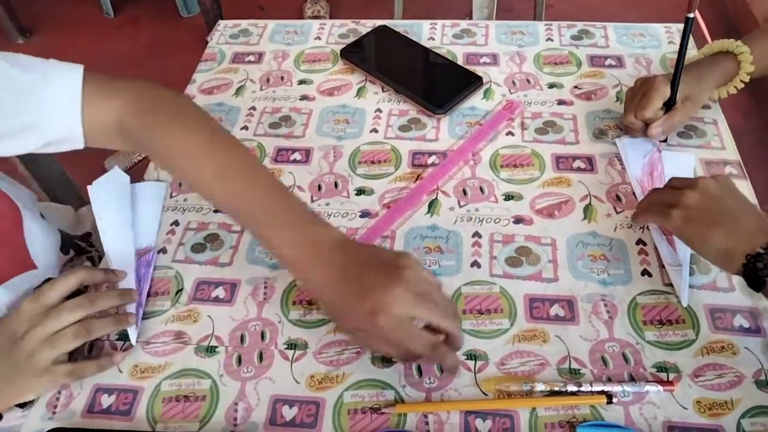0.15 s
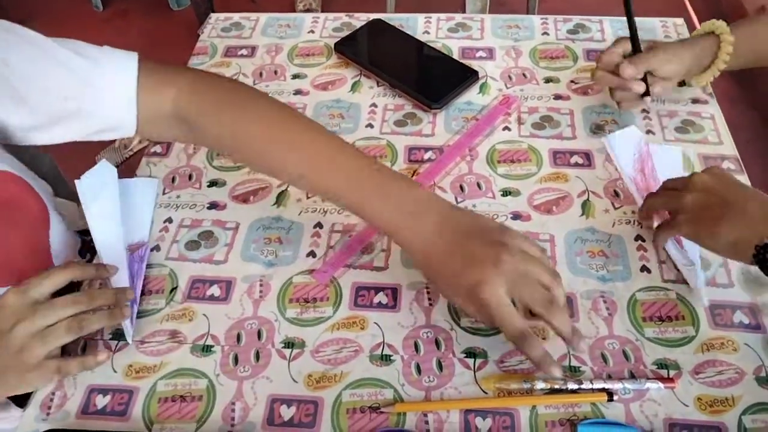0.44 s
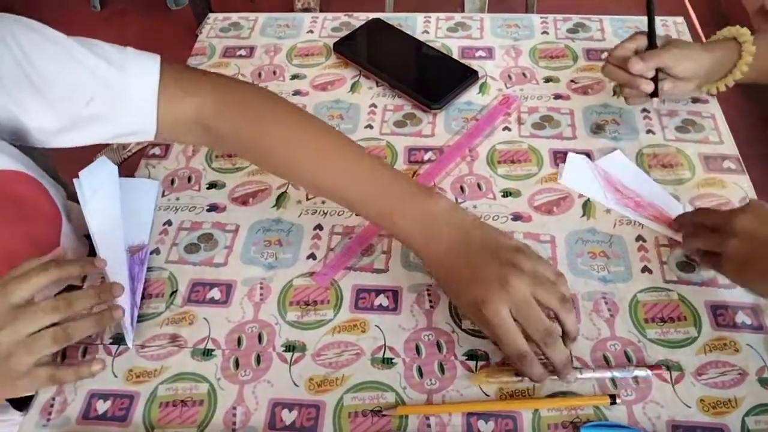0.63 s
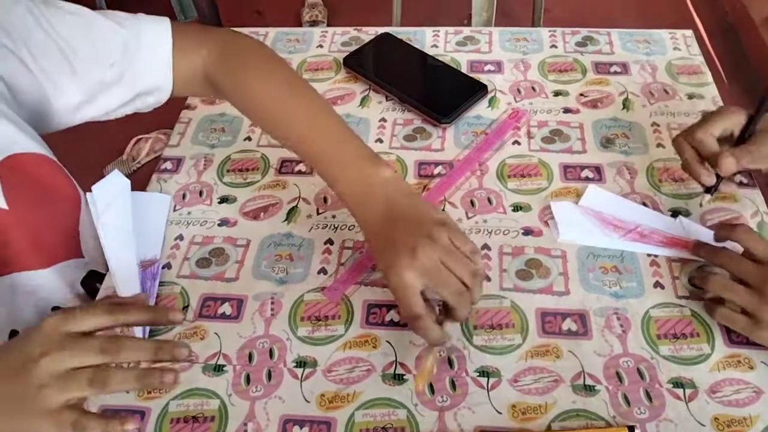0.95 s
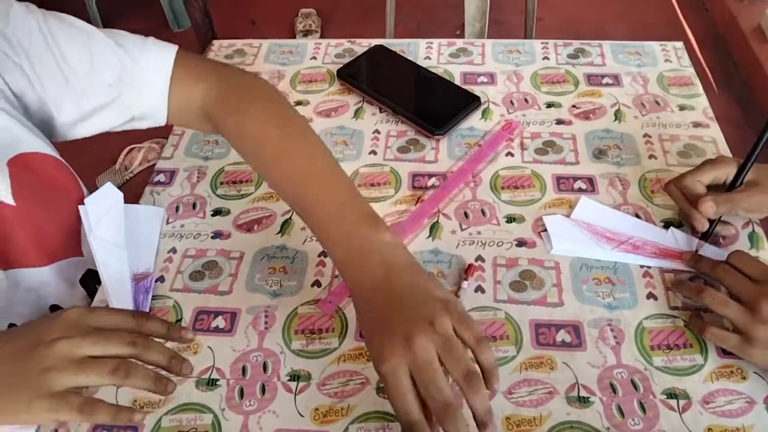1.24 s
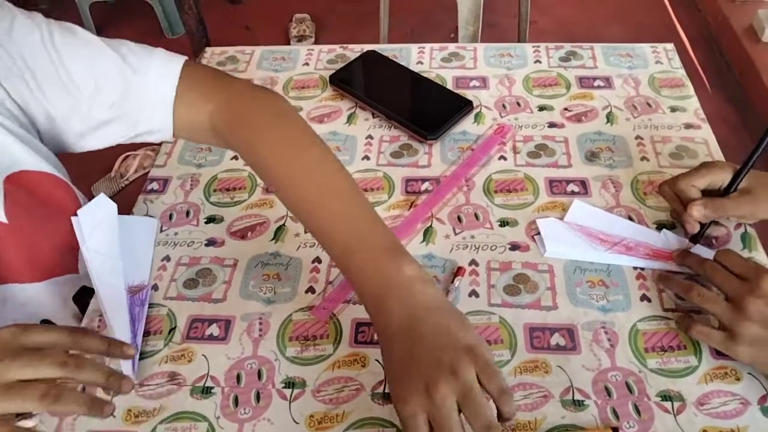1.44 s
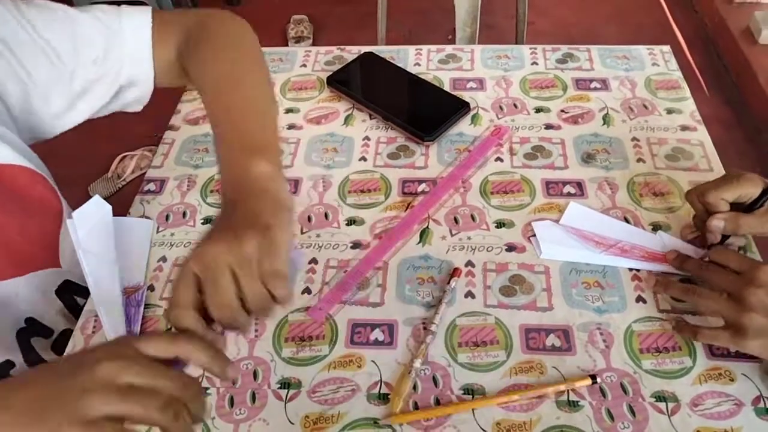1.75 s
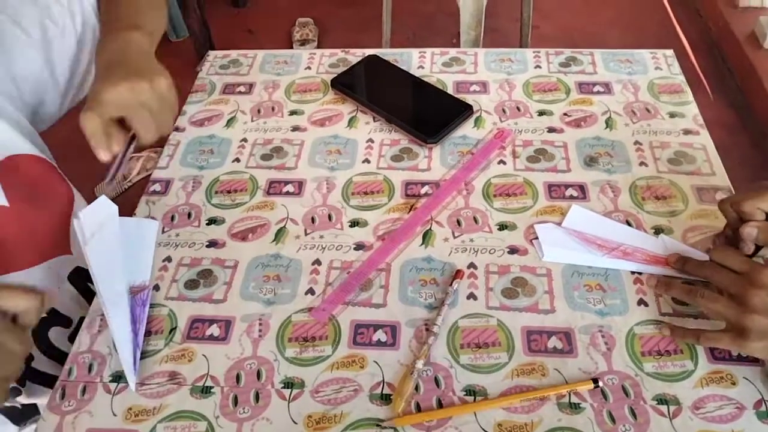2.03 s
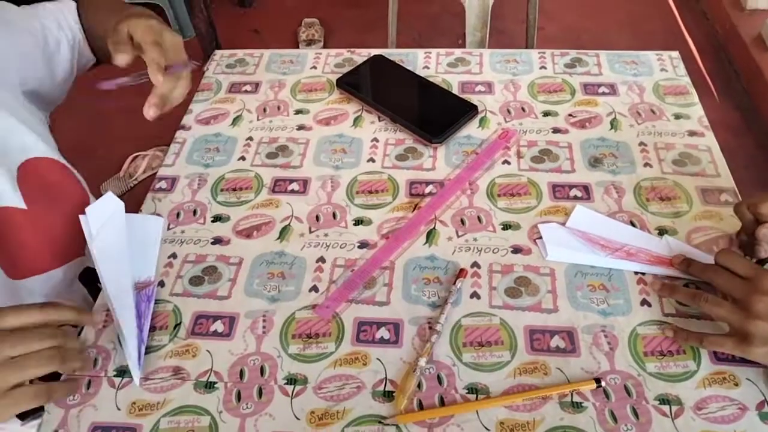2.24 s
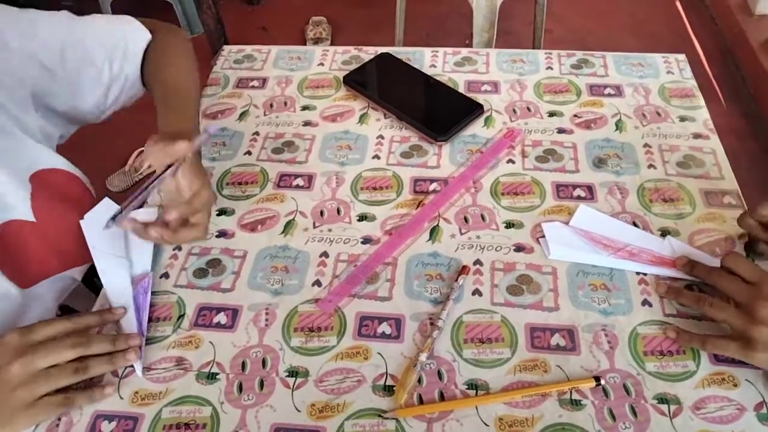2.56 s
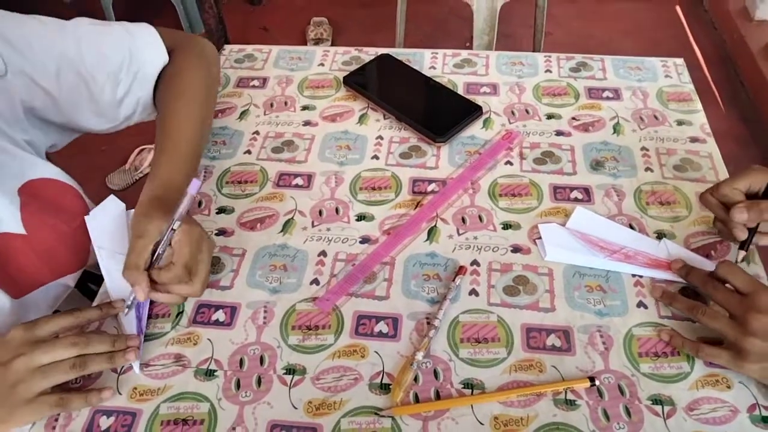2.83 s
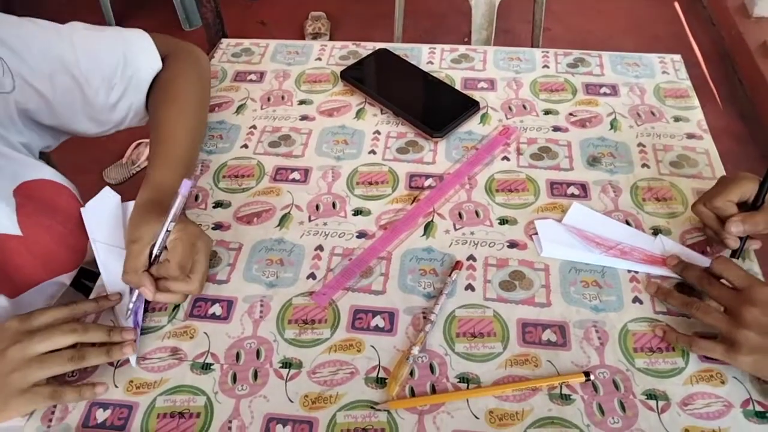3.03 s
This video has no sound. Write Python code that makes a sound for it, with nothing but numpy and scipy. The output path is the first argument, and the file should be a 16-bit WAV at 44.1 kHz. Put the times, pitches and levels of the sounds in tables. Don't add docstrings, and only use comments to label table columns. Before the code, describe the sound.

Pens clatter and tap on a thin tabletop with crackling paper, over a fading low engine hum

```python
import sys
import numpy as np
from scipy import signal
from scipy.fft import rfft, irfft, next_fast_len
from scipy.io import wavfile
from scipy.ndimage import map_coordinates

SR = 44100
rng = np.random.default_rng(int(sys.argv[2]) if len(sys.argv) > 2 else 0)


def master_out(mix):
    frames = np.transpose(np.atleast_2d(mix))
    ceiling = np.clip(frames, -1, 1)
    pcm = np.round(ceiling * 32767).astype(np.int16)
    wavfile.write(sys.argv[1], SR, pcm)


def magnitude_from_level(level_db):
    exponent = np.asarray(level_db, float) / 20
    return 10 ** exponent


N = 141120
TIP_HZ = 8946


def unit(x):
    return x / np.sqrt(np.mean(x ** 2) + 1e-20)


def along(points, hz):
    f, v = np.transpose(points)
    return np.interp(np.log(hz + 1), np.log(f + 1), v)


def curves(rows):
    s, *cols = np.transpose(rows)
    return [np.interp(np.arange(N) / SR, s, c) for c in cols]


def wobble(rate):
    knots = rng.standard_normal(int(N * rate / SR) + 4)
    return map_coordinates(knots, [np.arange(N) * rate / SR])


def filtered(x, response):
    m = next_fast_len(N + SR // 2)
    return irfft(rfft(x, m) * response(np.fft.rfftfreq(m, 1 / SR)), m)[:N]


def coloured(x, spectrum):
    return unit(filtered(x, lambda hz: magnitude_from_level(along(spectrum, hz))))


def resonant(x, peaks):
    def response(f):
        total = 0
        for k, (centre, width, db) in enumerate(peaks):
            loss = 1j * f * width
            total = total + (-1) ** k * magnitude_from_level(db) * loss / (centre * centre - f * f + loss)
        return total
    return filtered(x, response)


def add(track, s, sound):
    part = track[round(s * SR):][:len(sound)]
    part += sound[:len(part)]


def sine(hz, t):
    return np.sin(2 * np.pi * hz * t)


def decay(db, t, t60):
    return magnitude_from_level(db - 60 * t / t60)


def shiver(hz, t, size):
    drift = np.convolve(rng.standard_normal(len(t)) + 0.11, np.hanning(size), "same")
    return np.sin(2 * np.pi * hz * t + 6 * rng.random()) * unit(drift)


def grains(spectrum):
    grains_per_s, grain_db, grain_s, smooth = 900, 2, 0.00052, 1.5
    sizes = magnitude_from_level(grain_db * rng.exponential(size=N).clip(0, 3))
    hits = (rng.random(N) < grains_per_s / SR) * sizes
    envelope = signal.lfilter([1], [1, -np.exp(-1 / (grain_s * SR))], hits) + smooth
    return coloured(envelope * rng.standard_normal(N), spectrum)


def pen_contacts():
    # t/s, tip level/dB, barrel f/Hz, barrel level/dB
    taps = [(0.131, -34, 1870, -32.5), (0.6362, -30, 2640, -31.5), (0.6695, -32, 2650, -36),
            (0.6895, -35, 2250, -34), (0.692, -35, 2230, -34), (0.7045, -35, 2220, -36),
            (0.8035, -8, 2710, -26), (0.8047, -22.5, 2150, -27), (0.8063, -21, 2476, -17),
            (0.8083, -19, 1590, -25), (0.813, -27, 4300, -40), (0.8225, -28, 2500, -32),
            (0.832, -24, 2620, -30), (0.9376, -7.5, 2160, -22), (0.9402, -1.5, 1590, -20.5),
            (0.9434, -19, 2100, -33), (0.9416, -10, 2160, -21), (0.9613, -6, 1980, -15.5),
            (1.2285, -16, 2340, -26.5), (1.263, -15.5, 2490, -27), (1.2676, -34, 2350, -25.5),
            (1.272, -30, 2300, -29), (1.277, -37, 2460, -33), (1.287, -37, 2340, -34),
            (1.292, -35, 2040, -32), (1.301, -35, 2400, -37), (1.2818, -22, 2300, -23),
            (1.366, -14, 2120, -20), (1.3675, -18.5, 1904, -23.5), (1.3705, -30, 1970, -30),
            (1.4893, -2, 2514, -11), (1.4938, -15, 2250, -22.5), (2.263, -51, 2440, -39.5),
            (2.8593, -52, 1900, -49.5), (2.8754, -51, 1770, -48), (2.8883, -50, 1910, -47.5)]
    # t/s, tip level/dB, tip f/Hz, barrel level/dB
    ticks = [(0.3005, -22.5, 9050, -50), (1.0113, -20.5, 8400, -46), (1.233, -20.5, 9300, -36),
             (1.2458, -23, 8400, -54), (1.3275, -22, 9570, -50), (1.4284, -16, 8770, -42),
             (1.823, -10.5, 7000, -20.5), (1.8606, -29.5, 6300, -55), (2.2563, -34, 6000, -47),
             (2.271, -33.5, 7140, -59), (2.298, -35, 7170, -47), (2.5432, -21.5, 7700, -63),
             (2.7504, -26.5, 7870, -36.5), (2.941, -25.5, 8740, -50), (3.167, -23, 9570, -49)]
    # f/Hz, level/dB
    crack_colour = [(700, -23), (1800, -7), (3300, -17), (5000, -7), (6200, -6.5), (8800, 1.5),
                    (11000, -23), (15000, -12)]
    tick_barrel_hz, upper_ratio, upper_db = 2575, 1.362, -8
    barrel_t60, tip_t60, crack_t60 = 0.0094, 0.0067, 0.0072
    top_ring_hz, top_ring_db = 13940, -15
    out, t = np.zeros(N), np.arange(SR // 20) / SR
    cracks = coloured(rng.standard_normal(N), crack_colour)
    contacts = [(s, tip_db, TIP_HZ, hz, db) for s, tip_db, hz, db in taps]
    contacts += [(s, tip_db, hz, tick_barrel_hz, db) for s, tip_db, hz, db in ticks]
    for s, tip_db, tip_hz, hz, barrel_db in contacts:
        barrel = sine(hz, t) - magnitude_from_level(upper_db) * sine(upper_ratio * hz, t)
        barrel = barrel + 0.45 * shiver(1.234 * hz, t, size=48)
        barrel = barrel * decay(barrel_db + 9, t, barrel_t60)
        tip = sine(tip_hz, t) + 0.73 * shiver(.97 * tip_hz, t, size=36)
        tip = tip + magnitude_from_level(top_ring_db) * shiver(top_ring_hz, t, size=30)
        tip = tip * decay(tip_db - 0.5, t, tip_t60)
        noise = cracks[rng.integers(N - len(t)):][:len(t)]
        crack = decay(tip_db - 3.5, t, crack_t60) * noise
        barrel_onset = (1 - np.exp(-t / 0.00026)) ** 2
        tip_onset = 1 - np.exp(-t / 0.00035)
        add(out, s, barrel * barrel_onset + (tip + crack) * tip_onset)
    return out


def tabletop_knocks():
    # t/s, ring level/dB, thud f/Hz, thud level/dB
    knocks = [(.13, -34.5, 221, -24), (.134, -31, 628, -28), (.608, -34, 219, -26), (.635, -32, 399, -35),
              (.805, -22, 226, -42), (.941, -20.5, 232, -29), (.96, -18.5, 198, -29),
              (1.228, -35, 659, -33.5), (1.258, -36, 307, -26), (1.262, -49, 644, -34),
              (0.289, -44, 200, -32.5), (1.489, -35.5, 516, -33)]
    # f/Hz, level/dB, t60/s
    board_modes = [(188, -9, 0.36), (232, 1.5, 0.26), (400.2, 1, 0.3), (469, -2.5, 0.34), (604, 2.5, 0.052),
                   (840, -1, 0.085)]
    scatter_db = 1.5
    out, t = np.zeros(N), np.arange(SR // 2) / SR
    for s, db, thud_hz, thud_db in knocks:
        modes = 0
        for hz, level, t60 in board_modes:
            modes = modes + decay(level + rng.normal(0, scatter_db), t, t60) * sine(hz, t)
        modes = magnitude_from_level(db - 7.5) * modes * (0.47 + decay(0, t, 0.033))
        thud = decay(thud_db, t, 0.077) * (sine(thud_hz, t) + 0.2 * shiver(thud_hz, t, size=600))
        upper = decay((db + thud_db) / 2 - 12, t, 0.067) * shiver(940, t, size=60)
        cover = decay(db - 17.5, t, 0.29) * shiver(1301, t, size=90)
        add(out, s, (modes + thud + upper + cover) * (1 - np.exp(-t / 0.0015)))
    return out


def leaning_hand():
    s, hz, db, width_s = .65, 44, -37, .06
    t = np.arange(N) / SR - s
    return magnitude_from_level(db) * np.exp(-(t / width_s) ** 2) * sine(hz, t)


def paper_strokes():
    # t/s, length/s, level/dB, dull part level/dB
    slides = [(0.296, 0.12, -42.5, -13), (0.378, 0.35, -40.5, -15.5), (0.483, 0.067, -34, -13),
              (0.579, 0.15, -27.5, -19), (0.68, 0.093, -45.5, 3.5), (0.772, 0.12, -47, -2.5),
              (0.799, 0.089, -41.5, 7), (0.934, .11, -34, 1.5), (1.253, 0.07, -37, 3),
              (1.306, 0.056, -41.5, -3.5), (1.344, 0.15, -39, -4), (1.485, 0.072, -48, 6),
              (1.605, 0.11, -55.5, -10), (1.831, 0.054, -45, -1.5), (1.912, 0.23, -55.5, -3.5),
              (2.247, 0.049, -51.5, 4), (2.32, 0.11, -65, -5), (2.505, 0.33, -55.5, -6.5),
              (2.74, 0.058, -49.5, -3), (2.76, 0.084, -63, 3), (3.159, 0.053, -53, -6)]
    # f/Hz, level/dB per Hz
    bright = [(2650, -23.5), (4500, -11.5), (5080, -22.5), (6660, -10), (8600, 1), (11900, -25.5),
              (14200, -14.5), (15600, -20), (16000, -40.5)]
    # f/Hz, level/dB per Hz
    dull = [(400, 2), (1100, -7), (2300, 4), (3800, -2), (5500, -8), (8000, -13.5)]
    rise = 0.24
    high = grains(bright) * magnitude_from_level(1.6 * wobble(60))
    low = grains(dull) * magnitude_from_level(1.4 * wobble(60.57))
    out, time = np.zeros(N), np.arange(N) / SR
    for s, length, db, dull_db in slides:
        u = np.clip((time - s) / (rise * length), 0, None)
        out += magnitude_from_level(db) * u * np.exp(1 - u) * (high + magnitude_from_level(dull_db) * low)
    return out


def crease_snaps():
    # t/s, level/dB, top ring level/dB
    snaps = [(0.3485, -23, -52), (0.411, -23, -42), (0.4912, -32, -45), (0.4935, -18, -45),
             (0.5055, -18, -45), (0.51, -22, -45), (0.543, -32, -50), (0.5853, -15, -38),
             (0.5965, -23, -35), (0.6, -20, -27), (0.6094, -3.5, -18), (0.614, -9, -16), (0.634, -5, -30),
             (0.638, -4, -30), (0.6517, -6, -34), (0.6586, -13, -41), (0.6689, -2.5, -41),
             (0.6746, -12, -38), (0.6898, -19, -41), (0.6918, -7, -41), (0.7, -12, -38), (1.3185, -23, -45),
             (1.631, -40, -50), (1.843, -29, -50), (1.849, -33, -40), (1.8505, -32, -45)]
    out, t = np.zeros(N), np.arange(SR // 40) / SR
    for s, db, top_db in snaps:
        ring = sine(TIP_HZ * rng.normal(1, .04), t) + 0.64 * shiver(TIP_HZ, t, size=36)
        top = magnitude_from_level(top_db + 11.5) * shiver(13600, t, size=30)
        fall = decay(0, t, 0.0078) * (1 - np.exp(-t / 0.00044))
        add(out, s, fall * (magnitude_from_level(db - 6.5) * ring + top))
    return out


def fingertips():
    # t/s, length/s, level/dB
    swishes = [
        (1.958, .07, -57.5),
        (2.598, 0.13, -59),
    ]
    # f/Hz, level/dB
    swish_colour = [(4500, -30), (6000, 4), (7500, -9), (9500, -30)]
    swish = grains(swish_colour)
    out, time = np.zeros(N), np.arange(N) / SR
    for s, length, db in swishes:
        out += magnitude_from_level(db) * np.exp(-((time - s) / length * 2 - 1) ** 2 * 2) * swish
    return out


def engine():
    # t/s, firings per s, level/dB
    course = [
        (0, 25.55, -39.5),
        (.5, 25.15, -43),
        (1.05, 25.0, -41.5),
        (1.3, 24.5, -45),
        (2.02, 24.2, -45),
        (2.8, 23.5, -48),
        (3.2, 23.35, -55.5),
    ]
    # f/Hz, width/Hz, level/dB
    pipe_near = [(49.7, 20, -7), (103.7, 9.2, -5), (128, 12, -0.5), (198, 35, -5.5), (248.8, 8.6, 3),
                 (343, 37, -3.5), (477, 204, -10)]
    # f/Hz, width/Hz, level/dB
    pipe_far = [(74.6, 12.6, -5.5), (90.4, 38, -7), (146.5, 11.7, -2.5), (226, 16.3, 3.5), (256.5, 15, 1),
                (355, 70, -8.5)]
    firing_s = 2.211
    soft_hz = 420
    rate, db = curves(course)
    turns = np.cumsum(rate) / SR
    turns = turns - turns[round(firing_s * SR)] + .006 * wobble(20)
    firings = np.diff(np.floor(turns), prepend=np.floor(turns[0])).clip(0)
    pulses = firings * magnitude_from_level(1.8 * wobble(23.54))
    pulses = filtered(pulses, lambda hz: 1 / (1 + 1j * hz / soft_hz) ** 3)
    far = np.interp(np.arange(N) / SR, (0.88, 1.6), [0, 1])
    pipe = (1 - far) * unit(resonant(pulses, pipe_near)) + far * unit(resonant(pulses, pipe_far))
    pipe = unit(pipe + magnitude_from_level(-11) * room(pipe))
    return magnitude_from_level(db + 2.5) * pipe + road_roar(db)


def road_roar(engine_db):
    # f/Hz, level/dB
    roar_colour = [(20, -4), (45, 6.5), (230, -5), (550, -11), (900, -25), (2500, -32.5)]
    level = -50.5 + .35 * (engine_db - engine_db.mean()) + wobble(2.6)
    return magnitude_from_level(level) * coloured(rng.standard_normal(N), roar_colour)


def room(x):
    # f/Hz, t60/s
    room_t60 = [(200, 0.57), (2500, 0.37), (8000, 0.18), (15000, 0.01)]
    out, step = np.zeros(N), SR // 3
    for a in range(0, N, step):
        hz, t, z = signal.stft(rng.standard_normal(SR // 2), SR, nperseg=256)
        fading = z * magnitude_from_level(-60 * t / along(room_t60, hz)[:, None])
        tail = signal.istft(fading, SR, nperseg=256)[1]
        add(out, a / SR + 0.0026, signal.fftconvolve(x[a:a + step], tail / np.linalg.norm(tail)))
    return out


def street_air():
    # t/s, level/dB
    air_level = [
        (0, -45.5),
        (.27, -49.5),
        (1.15, -54),
        (1.72, -50),
        (2.05, -57.5),
        (3.2, -65),
    ]
    # f/Hz, level/dB per Hz
    hiss_colour = [(500, 2.5), (1200, -8), (2300, 0.5), (3800, -11.5), (5200, -19.5), (8700, -5),
                   (11700, -45), (15000, -26)]
    db, = curves(air_level)
    return magnitude_from_level(db + wobble(4.64)) * coloured(rng.standard_normal(N), hiss_colour)


def microphone_noise():
    # f/Hz, level/dB
    self_colour = [(2500, -4), (5000, -10.5), (6300, -6), (8800, 2), (11500, -14.5), (14800, -8.5)]
    return magnitude_from_level(-57.5 + 3.1 * wobble(6.31)) * coloured(rng.standard_normal(N), self_colour)


def scene():
    near = pen_contacts() + tabletop_knocks() + leaning_hand()
    near = near + paper_strokes() + crease_snaps() + fingertips()
    outside = engine() + street_air()
    return (near + magnitude_from_level(-20) * room(near) + outside + microphone_noise())[None]


def low_pass(x):
    return signal.sosfilt(signal.butter(12, 16830, fs=SR, output="sos"), x)


def record(dry):
    mix = filtered(dry[0], lambda hz: np.where(hz < 15600, 1, magnitude_from_level(-33)))[None]
    return low_pass(mix)


dry = scene()
out = record(dry)
master_out(out)
```